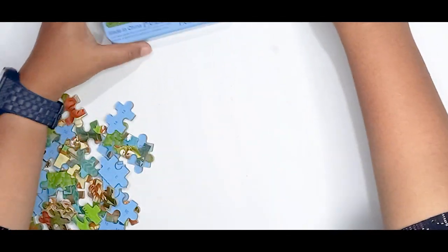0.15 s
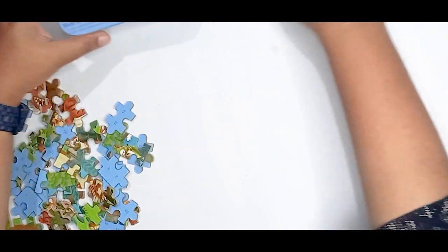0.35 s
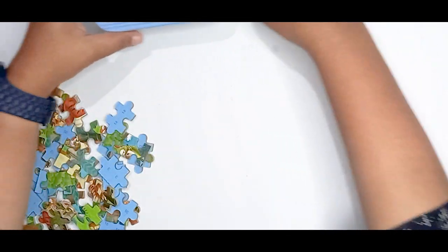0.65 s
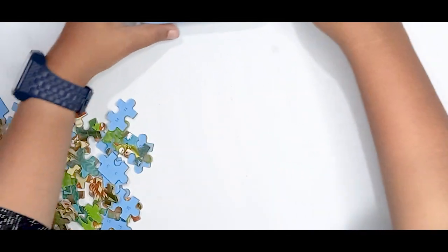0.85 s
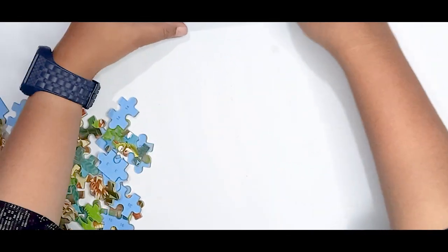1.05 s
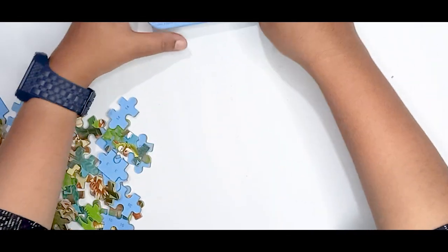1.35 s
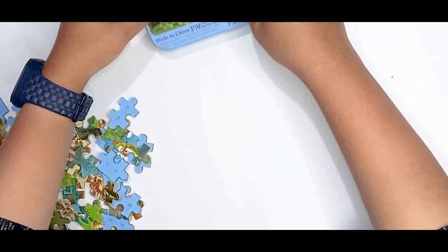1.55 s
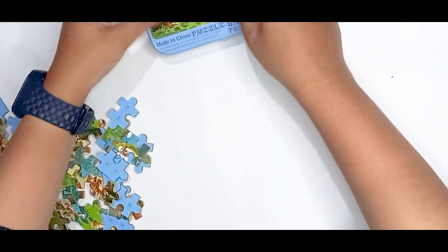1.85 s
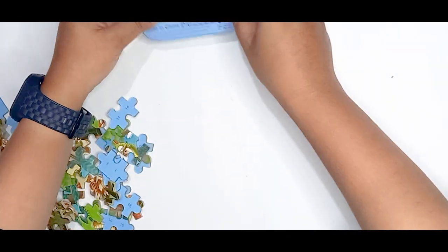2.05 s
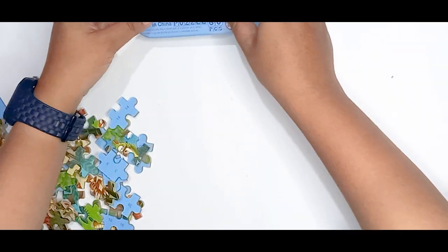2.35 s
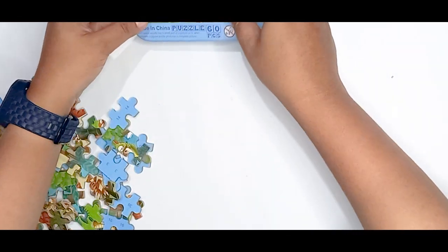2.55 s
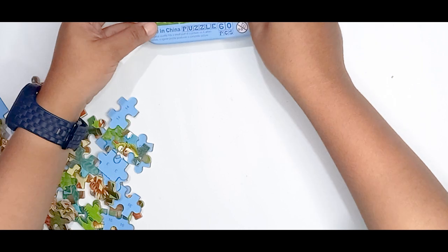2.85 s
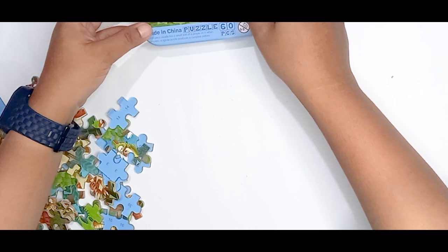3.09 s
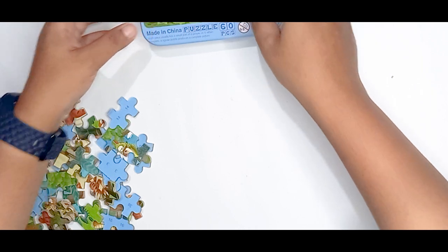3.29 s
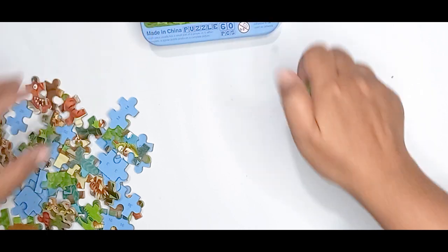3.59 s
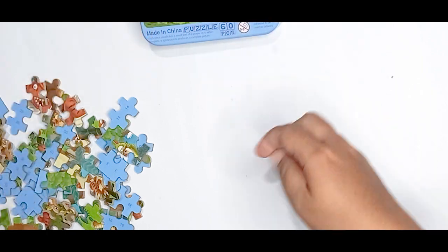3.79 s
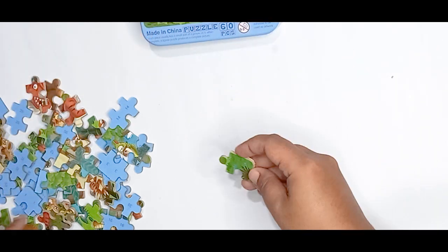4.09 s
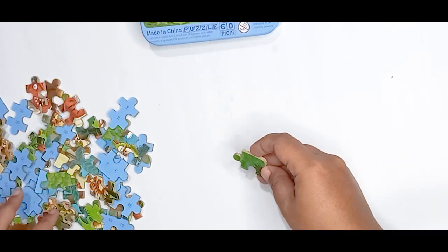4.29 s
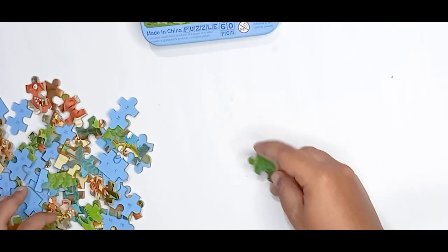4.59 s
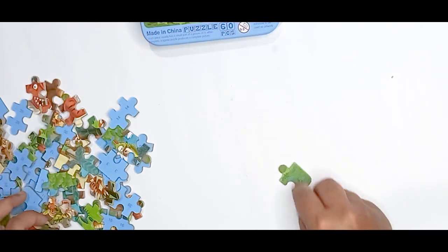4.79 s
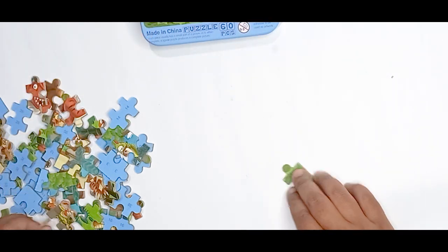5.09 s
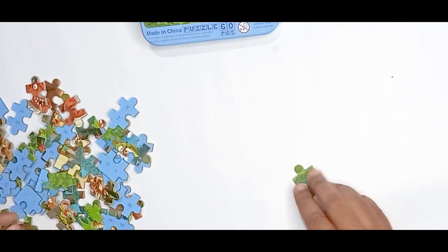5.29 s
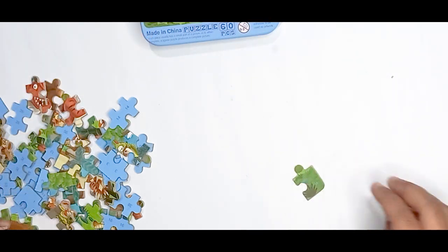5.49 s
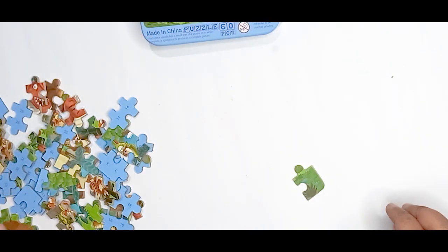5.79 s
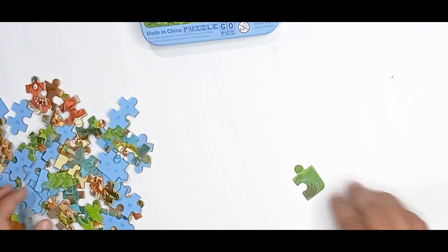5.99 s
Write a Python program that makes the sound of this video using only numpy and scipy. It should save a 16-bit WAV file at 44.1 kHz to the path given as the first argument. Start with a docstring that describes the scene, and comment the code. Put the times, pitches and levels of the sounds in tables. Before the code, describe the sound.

A close, dry indoor scene with faint, bass-leaning hiss and a short room response. At first there is a tiny tick and soft rubbing, with a light bump of the arms. Around 0.5 s a small tin gives a loud, hollow metallic clank; at 0.77 s comes a sharp, bright snap, then a lesser rattle at 0.87. A strong clank with a scrape and low table bump lands at 1.05, and a scuffing, chattering knock at 1.36. Rubbing continues, with paired clanks near 2.1 and 2.24, a duller knock and scrape at 2.68, and a crisp snap at 2.9. Soft arm thuds follow until 3.4. From 3.5 s it is much quieter: faint brushing of skin and card, a cluster of cardboard clicks at 4.7, a fine slide around 5.05, near-silence with tiny ticks, then a clearer click at 5.9 and faint ticks at 6.0.

```python
"""Two hands work a small jigsaw tin on a table in a room: the lid snaps and the sheet metal clanks and rubs.
Then a cardboard piece is picked up, clicked down and slid over the table, and another clicks in the pile.
The arms bump the table softly over a faint hiss. Blows on the tin ring its modes under the damping grip;
cardboard gives short ticks; rubbing is a stream of tiny slips; the table and the air are shaped noise."""
import sys
import numpy as np
from scipy import signal
from scipy.fft import rfft
from scipy.io import wavfile
from scipy.ndimage import uniform_filter1d

SR = 44100
rng = np.random.default_rng(int(sys.argv[2]) if len(sys.argv) > 2 else 0)


def generate_wav(signal):
    """Clip the signal to [-1, 1] and save it as 16-bit WAV at the path in sys.argv[1]."""
    frames = np.transpose(np.atleast_2d(signal))
    scaled = np.clip(frames, -1, 1) * 32767
    pcm = np.round(scaled).astype(np.int16)
    wavfile.write(sys.argv[1], SR, pcm)


N = 270763

# knocks of the tin, with band levels aimed at over their first 25 ms: start_s, thump_db, hollow_db, body_db,
# clang_db, edge_db, sizzle_db, chatter_s (decay of the rebounds), ring_db (relative),
# freedom (from the grip, 0-1), spot_hz (favoured by the struck spot)
KNOCK_ROWS = [(0.424, -51, -67.5, -66.5, -69.5, -61, -63, 0.011, -11, 0.6, 6540),
              (0.484, -61, -68.5, -49.5, -61, -49, -53, 0.0097, -10, 0.5, 2000),
              (0.4973, -38, -35.5, -32.5, -27.5, -31.5, -52, 0.0031, 7.5, 1, 2440),
              (0.7747, -59, -41.5, -38.5, -35, -23, -37, 0.00093, 7.5, 0.79, 4470),
              (0.872, -49, -54.5, -39.5, -43.5, -37.5, -45.5, 0.0024, 7, 0.61, 1190),
              (1.0528, -52, -34.5, -30, -34.5, -33.5, -45, 0.0039, 3.5, 0.64, 870),
              (1.194, -49, -49, -52, -69.5, -68, -73, 0.0062, 3.5, 0.8, 930),
              (1.361, -57.5, -51.5, -38.5, -45.5, -39.5, -48.5, 0.031, 9, 0.59, 1100),
              (1.571, -59, -62.5, -67.5, -71, -81, -94, 0.0056, -5, 0.34, 800),
              (1.952, -57, -52, -59, -75, -76, -85, 0.00071, -13, 0.24, 844),
              (2.061, -56, -72, -69, -71, -67, -86, 0.0029, -16, 0.51, 1200),
              (2.102, -51, -42.5, -37.5, -47, -54, -63, 0.0041, 14, 0.28, 780),
              (2.1085, -53.5, -73, -54, -50, -45, -51.5, 0.0015, 14.5, 0.23, 4850),
              (2.2364, -63, -50.5, -42, -41.5, -45.5, -63, 0.00093, 8, 0.6, 1900),
              (2.254, -47, -52, -82.5, -55, -50.5, -61.5, 0.0059, -9, 0.85, 4700),
              (2.681, -59, -47, -50, -60.5, -59, -68, 0.0029, 8, 0.83, 587),
              (2.688, -61, -66, -68, -50.5, -51, -60.5, 0.0016, 6.5, 0.64, 6100),
              (2.903, -73, -46, -39, -40.5, -31, -41, 0.0006, -4.5, 0.78, 7020),
              (3.075, -55, -50.5, -73.5, -80, -67, -87, 0.031, -14, 0.46, 522)]
# clicks of cardboard pieces and fingertips, likewise: start_s, thump_db, hollow_db, body_db, clang_db,
# edge_db, sizzle_db, chatter_s
CLICK_ROWS = [(0.064, -67.5, -61, -76, -71.5, -67.5, -64, 0.009),
              (3.661, -72, -79, -75, -90, -71, -91, 0.0011),
              (4.6815, -60, -70.5, -73.5, -62, -68.5, -59, 0.0011),
              (4.691, -53.5, -86, -75, -84, -56.5, -62, 0.0066),
              (4.749, -60.5, -63, -62, -62, -63, -60, 0.0029),
              (4.93, -74.5, -81, -90, -80.5, -67.5, -67.5, 0.017),
              (5.003, -71, -79, -84, -81, -72.5, -76, 0.0034), (5.02, -78, -80, -87, -88, -74, -75, 0.0029),
              (5.489, -73.5, -87.5, -95, -100, -67.5, -72, 0.0052),
              (5.769, -76.5, -87, -92, -91, -71.5, -81.5, 0.0017),
              (5.9153, -52.5, -64.5, -58, -52.5, -52.5, -65.5, 0.003),
              (5.999, -72, -64, -73, -67, -59.5, -65, 0.00094),
              (6.021, -61.5, -70, -78, -86, -72, -80, 0.002)]
# the hands brush and weigh on the table until the piece is let go, easing off over EASE_S
LET_GO_S, EASE_S = 5.23, 0.35
# the slow clock of hand movements (s)
CLOCK = np.arange(0, N / SR, 0.002)


def amp(db):
    """Decibels to gain."""
    return 10 ** (np.asarray(db) / 20)


def evened(x):
    """Scales to an rms of 1."""
    return x / np.sqrt(np.mean(x ** 2) + 1e-30)


def unit(x):
    """Scales to an energy of 1."""
    return x / np.sqrt(np.sum(x ** 2) + 1e-30)


def read(points, hz):
    """Reads a curve over frequency, interpolating on a log-frequency axis."""
    f, value = np.transpose(points)
    return np.interp(np.log(hz + 1), np.log(f + 1), value)


def add(mix, s, sound):
    """Mixes a sound in at a time (s)."""
    part = mix[max(round(s * SR), 0):][:len(sound)]
    part += sound[:len(part)]


def colour(x, points, size=8192):
    """Causal minimum-phase filter with the given spectrum."""
    log_gain = np.log(amp(read(points, abs(np.fft.fftfreq(size, 1 / SR)))))
    spectrum = np.exp(np.conj(signal.hilbert(log_gain)))
    taps = np.fft.ifft(spectrum).real[:size // 2]
    return signal.fftconvolve(x, taps)[:len(x)]


def dying(t, t60):
    """Gain that falls 60 dB in t60."""
    return np.exp(-np.log(1000) * t / np.maximum(t60, 1e-4))


def noise(tone):
    """Steady noise with the given spectrum; the filter's first second is dropped."""
    return evened(colour(rng.standard_normal(N + SR), tone)[SR:])


def room(size=22050, build_s=0.004):
    """Diffuse echoes that build up quickly and die band by band."""
    # decay of the room: frequency_hz, t60_s
    room_decay = [(150, 0.38), (600, 0.22), (2000, 0.42), (7000, 0.31), (14000, 0.35)]
    t = np.arange(size) / SR
    hz, when, z = signal.stft(rng.standard_normal(size), SR, nperseg=256)
    faded = z * dying(when, read(room_decay, hz)[:, None])
    tail = signal.istft(faded, SR, nperseg=256)[1][:size]
    return unit(tail * (1 - np.exp(-t / build_s)))


def echoed(x, tail, room_db):
    """A sound with the room's answer."""
    return x + amp(room_db) * signal.fftconvolve(x, tail)[:len(x)]


def stroke(s, db, rise_s, fall_s, drop_db=20):
    """Gain of one push: it swells to its peak at s and dies away, by drop_db over the rise and the fall."""
    away = np.maximum((s - CLOCK) / rise_s, (CLOCK - s) / fall_s)
    return amp(db - drop_db * np.minimum(away, 10))


def resting(start_s, end_s, db):
    """Steady gain while the hands are in contact, easing in before and out after."""
    return amp(db) * np.clip(1 + np.minimum(CLOCK - start_s, end_s - CLOCK) / EASE_S, 0, 1)


def together(gains):
    """Unrelated pushes add in power; gives one gain for every sample."""
    return np.interp(np.arange(N) / SR, CLOCK, np.sqrt(sum(gain ** 2 for gain in gains)))


def friction(tone, per_s, spread_db, smooth, catch_db):
    """Tiny slips of uneven size over a smooth rub, catching and freeing many times a second."""
    size = amp(spread_db * np.minimum(rng.exponential(1, N), 4))
    slips = evened(size * rng.standard_normal(N) * (rng.random(N) < per_s / SR))
    wander = uniform_filter1d(rng.standard_normal(N), size=500)
    wander = evened(uniform_filter1d(wander, size=300))
    rub = slips + smooth * rng.standard_normal(N)
    return evened(colour(amp(catch_db * wander) * rub, tone))


def contact(t, chatter_s, per_s, full_s):
    """One blow, then tiny rebounds that die away; a long chatter carries more of the energy."""
    hits = rng.standard_normal(len(t)) * (rng.random(len(t)) < per_s / SR)
    rebounds = hits * np.exp(-t / max(chatter_s, 1e-4))
    push = unit(rebounds) * chatter_s / full_s  # as strong as the blow when chatter_s is full_s
    push[0] += 1
    return push


def balance(x, band_db, size=4096):
    """Filters a blow so that its first 25 ms come near the wanted level in each band."""
    # limits of thump, hollow, body, clang, edge and sizzle: limit_hz
    band_limits = [100, 300, 800, 1600, 4000, 8000, 16000]
    count = SR // 40
    power = 2 * abs(rfft(x[:count], size)) ** 2 / size / count
    hz, edges = np.fft.rfftfreq(size, 1 / SR), np.array(band_limits)
    low, high = edges[:-1], edges[1:]
    own_db = [10 * np.log10(power[(hz >= lo) & (hz < hi)].sum() + 1e-20) for lo, hi in zip(low, high)]
    return colour(x, np.transpose([np.sqrt(high * low), np.array(band_db) - own_db]))


def air():
    """The faint hiss behind everything: steady noise, strongest in the bass."""
    # frequency_hz, density_db (relative, per Hz)
    air_tone = [(25, -4), (100, -6), (280, -18.5), (500, -19.5), (1000, -26.5), (2000, -34.5),
                (4500, -36.5), (7000, -33.5), (9000, -37), (16000, -39)]
    return amp(-68.5) * noise(air_tone)


def table():
    """The table answers knocks, clicks and the weight of the arms with a short thud and a longer rumble."""
    # spectra of rumble and thud: frequency_hz, density_db (relative, per Hz)
    rumble_tone = [(10, -12), (28, -7), (55, 6), (75, -3), (110, -23.5), (250, -64.5)]
    thud_tone = [(50, -17), (100, -7), (165, -1.5), (280, -10), (450, -16.5), (1000, -50)]
    # soft bumps of the arms: peak_s, rumble_db, thud_db (both before the mix gains), rise_s, fall_s
    arm_bumps = [(0.09, -49.5, -58.5, 0.054, 0.11), (1.078, -40, -58, 0.12, 0.32),
                 (2.75, -52, -58.5, 0.2, .5), (2.92, -66, -49, 0.035, 0.11), (3.15, -75, -53.5, 0.11, .3),
                 (3.36, -45, -68, 0.067, 0.36), (3.769, -47, -60, 0.2, 0.19), (5.13, -61.5, -71, .2, .25),
                 (6.065, -48, -74, 0.062, 0.12)]
    lag_s, shake_rise_s, rumble_fall_s, thud_fall_s = 0.026, 0.03, 0.12, 0.09
    # a knock or click shakes the table in proportion to its thump
    blows = [(s, thump_db) for s, thump_db, *_ in KNOCK_ROWS]
    blows += [(s, thump_db - 11) for s, thump_db, *_ in CLICK_ROWS]
    # hands are never quite still
    rumble = [resting(0, LET_GO_S, db=-65)]
    thud = [resting(0, LET_GO_S, db=-73)]
    for s, thump_db in blows:
        rumble.append(stroke(s + lag_s, thump_db + 0.5, shake_rise_s, rumble_fall_s))
        thud.append(stroke(s + lag_s, thump_db, shake_rise_s, thud_fall_s))
    for s, rumble_db, thud_db, rise_s, fall_s in arm_bumps:
        rumble.append(stroke(s, rumble_db, rise_s, fall_s))
        thud.append(stroke(s, thud_db, rise_s, fall_s))
    rumbling = amp(-3.0) * together(rumble) * noise(rumble_tone)
    thudding = amp(-2.5) * together(thud) * noise(thud_tone)
    return rumbling + thudding


def slide(tail):
    """Fine, bright friction of fingers and card on the table, over a faint brush until the piece is let go."""
    # frequency_hz, density_db (relative, per Hz)
    slide_tone = [(300, -19), (1000, -10.5), (2200, -7.5), (3200, -11), (5300, -5), (6900, 1.5), (8800, -7),
                  (10800, -6.5), (12500, -14), (16000, -17.5)]
    # strokes of skin and cardboard: hardest_push_s, push_db (before echo and mix gain), rise_s, fall_s
    slide_strokes = [(0.12, -66, 0.28, 0.11), (0.351, -74, 0.23, .3), (0.455, -57.5, 0.043, 0.34),
                     (1.042, -44.5, 0.015, 0.079), (1.53, -72, 0.61, .8), (2.03, -63, 0.38, 0.12),
                     (2.66, -72, 0.83, .5), (3.45, -62.5, 0.33, 0.26), (3.94, -67.5, 0.21, 0.38),
                     (4.4, -62, .025, 0.21), (4.6, -64, 0.31, 0.11), (4.775, -58.5, 0.054, 0.027),
                     (4.87, -72.5, 0.12, 0.37), (5.057, -58, 0.0096, 0.21), (5.6, -73, 0.063, 0.16),
                     (6.05, -79, 0.16, .2)]
    slips = friction(slide_tone, per_s=750, spread_db=1.0, smooth=1.2, catch_db=1.15)
    brush = resting(0, LET_GO_S, db=-76)
    push = together([brush] + [stroke(*row) for row in slide_strokes])
    return amp(-1) * echoed(push * slips, tail, room_db=-11.5)


def click(row, card_db=-2, card_t60=0.025, room_db=-6):
    """Cardboard hardly rings: a short tick with tiny rebounds, and the room's answer from that spot."""
    # a cardboard piece on the table: frequency_hz, gain_db (relative)
    card_tone = [(100, -2.5), (260, 9.5), (700, 4), (1000, -2), (1380, -1), (1750, -7.5), (3000, 2),
                 (5400, 7), (7000, 16.5), (8600, 3), (11000, -3), (16000, -20.5)]
    s, *band_db, chatter_s = row
    tail = room()
    t = np.arange(len(tail)) / SR
    tick = unit(rng.standard_normal(len(t)) * dying(t, card_t60 + 4 * chatter_s))
    blow = unit(contact(t, chatter_s, per_s=1700, full_s=0.00061))
    direct = unit(blow + amp(card_db) * tick)
    return s, balance(colour(direct + amp(room_db) * tail, card_tone), band_db)


def tin_modes(count, size=22050):
    """Free rings of the tin: its clear modes, and a crowd of weaker ones spread over the whole range."""
    # clear modes of the tin: mode_hz, level_db (relative)
    clear_modes = [(944, 3), (1042, -3), (1105, -1.5), (1155, 1), (1325, 0.5), (1406, 3), (1446, -4),
                   (1820, -0.5), (2006, 3), (2051, -6), (2369, -8.5), (2484, -2.5), (2596, -10.5),
                   (2783, -7.5), (3133, 3.5), (3278, -2), (3817, 2), (3951, -7), (4305, -6.5), (4556, -6.5),
                   (4881, -3), (4970, -1.5), (5582, -5.5), (5847, -4), (6230, -2.5), (6680, -3.5),
                   (7091, 2.5), (7584, 3), (10140, -3.5)]
    # how long the free tin rings: frequency_hz, t60_s
    free_decay = [(400, .2), (900, .33), (1350, .46), (2000, .31), (3200, .31), (5000, .25), (12000, .18)]
    t = np.arange(size) / SR
    clear_hz, clear_db = np.transpose(clear_modes)[:, :, None]
    place = (np.arange(count) + rng.random(count))[:, None] / count
    crowd_hz = 400 + 15000 * place ** 1.3
    clear, crowd = (dying(t, read(free_decay, hz)) * np.exp(2j * np.pi * hz * t) for hz in (clear_hz, crowd_hz))
    return amp(clear_db) * clear, crowd


def struck(modes, uneven_db=3):
    """Each spot of the tin wakes the modes by different amounts and in different phases."""
    strength = amp(uneven_db * (2 * rng.random(len(modes)) - 1))
    weight = strength * np.exp(2j * np.pi * rng.random(len(modes)))
    return unit((weight @ modes).real)


def clustered(x, count=70):
    """Neighbouring modes share nodes at the struck spot, so they come in strong and weak clusters."""
    hz = 500 + 11500 * np.linspace(0, 1, count) ** 1.5
    return colour(x, np.transpose([hz, rng.uniform(-5.5, 5.5, count)]))


def scrape(clear, crowd, tail, metal_db=1):
    """Slips of the tin over table and lid are heard directly and through its ringing walls."""
    # frequency_hz, density_db (relative, per Hz)
    scrape_tone = [(200, -16), (450, 3.5), (750, 1), (1050, -2.5), (1400, -6), (1700, -5), (2600, -13),
                   (5000, -13.5), (10000, -30)]
    # strokes of the tin: hardest_push_s, push_db (before the mix gain), rise_s, fall_s
    scrape_strokes = [(0.08, -65.5, .04, 0.18), (1.04, -47.5, .025, .06), (1.21, -55, 0.39, 0.1),
                      (1.355, -52.5, 0.032, 0.12), (1.53, -56.5, 0.11, .12), (1.76, -63.5, 0.085, 0.12),
                      (2.05, -56.5, 0.2, 0.53), (2.56, -66.5, 0.076, 0.22), (2.675, -49.5, 0.031, 0.055),
                      (2.897, -60.5, 0.02, 0.11)]
    slips = friction(scrape_tone, per_s=1200, spread_db=2, smooth=1.0, catch_db=3.0)
    walls = struck(crowd) + amp(-4) * struck(clear)
    ringing = evened(signal.fftconvolve(slips, walls)[:N])
    hold = resting(0.89, 3.45, db=-77.5)  # a faint rub while the hands hold the tin
    push = together([hold] + [stroke(*row) for row in scrape_strokes])
    return amp(0.5) * push * evened(echoed(slips + amp(metal_db) * ringing, tail, room_db=-6.5))


def knock(row, clear, crowd, tail, crack_db=-1, crack_t60=0.076, grip_t60=0.18, spot_db=6, spot_width=0.13):
    """The tin cracks, then rings with clear modes over a crowd of weaker ones; the grip damps them."""
    # the tin's crowd of weaker modes: frequency_hz, gain_db (relative)
    sheet_tone = [(100, -15.5), (430, -9), (540, -4), (720, -5), (950, 5.5), (1400, -2.5), (1650, -3),
                  (2000, -1), (5200, -5.5), (7000, -1.5), (8400, -9.5), (10500, -9), (12500, -19),
                  (16000, -25.5)]
    s, *band_db, chatter_s, ring_db, free, spot_hz = row
    t = np.arange(len(tail)) / SR
    free = np.clip(free, 0.05, 1)
    swell = 1 - np.exp(-t / max(chatter_s * 0.58, 1e-4))  # a scuffing contact feeds the metal gradually
    held = swell * dying(t * (1 / free - 1), grip_t60)  # a wholly free tin is not damped
    crack = amp(crack_db) * unit(rng.standard_normal(len(t)) * dying(t, crack_t60))
    blow = amp(-7.5) * unit(contact(t, chatter_s, per_s=670, full_s=0.00065))
    body = unit(colour(blow + (crack + struck(crowd, uneven_db=6.5)) * held, sheet_tone))
    fade = 1.5 + dying(t, 0.36)  # the ring drops quickly at first, then lingers
    ring = amp(ring_db - 6) * unit(struck(clear) * fade) * held
    # a peak around the pitch that the struck spot favours
    spot = [(spot_hz * np.exp(-spot_width), 0), (spot_hz, spot_db), (spot_hz * np.exp(spot_width), 0)]
    heard = echoed(clustered(body), tail, room_db=-8) + ring
    return s, balance(colour(heard, spot), band_db)


def scene():
    """Knocks, clicks, rubbing, the shaken table and the air of the room."""
    tail = room()
    clear, crowd = tin_modes(count=240)
    mix = air()
    for row in KNOCK_ROWS:
        add(mix, *knock(row, clear, crowd, tail))
    for row in CLICK_ROWS:
        add(mix, *click(row))
    mix += scrape(clear, crowd, tail)
    mix += slide(tail)
    return (mix + table())[None]


def record(dry):
    """The recorder's band limit: a steep low-pass at 16.1 kHz."""
    taps = signal.firwin(511, 16100, window=("kaiser", 9), fs=SR)
    return signal.oaconvolve(dry, taps[None], "same")


dry = scene()
out = record(dry)
generate_wav(out)
```